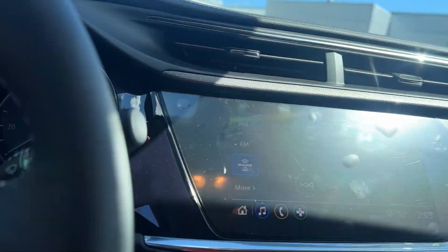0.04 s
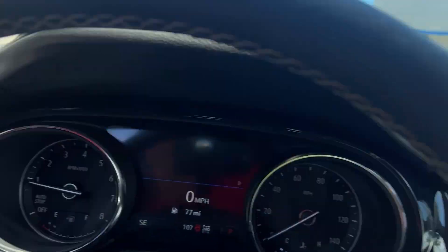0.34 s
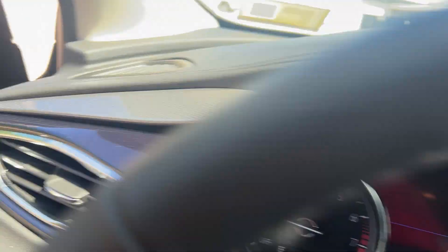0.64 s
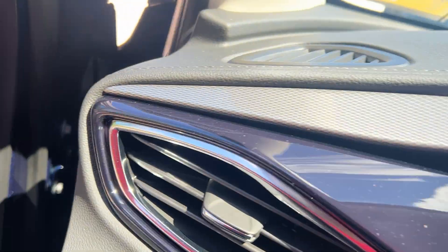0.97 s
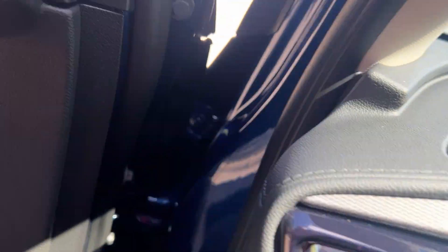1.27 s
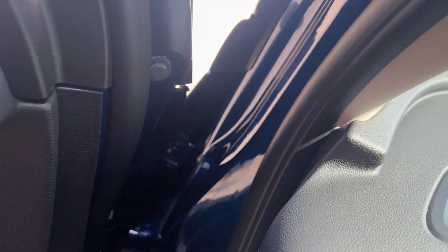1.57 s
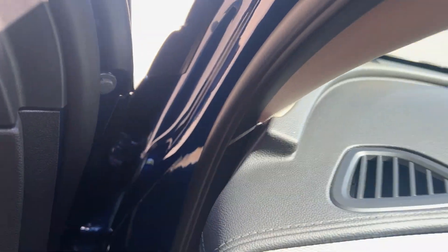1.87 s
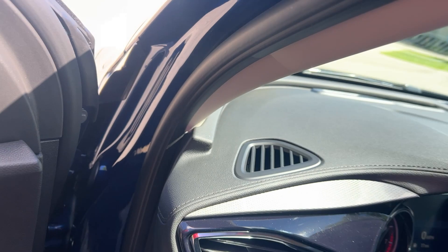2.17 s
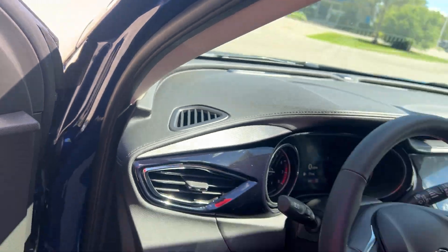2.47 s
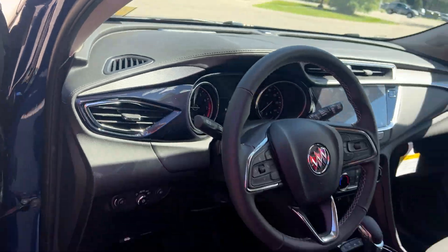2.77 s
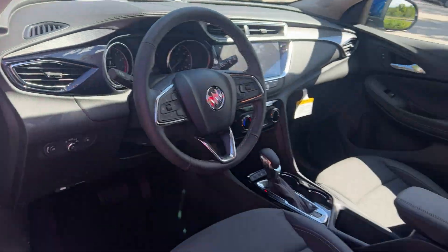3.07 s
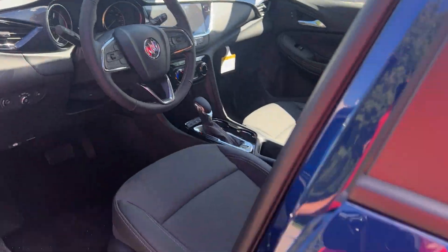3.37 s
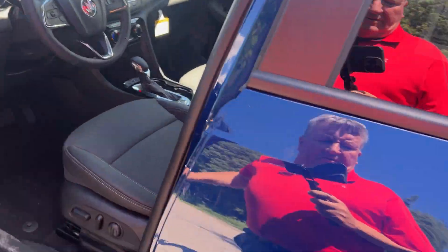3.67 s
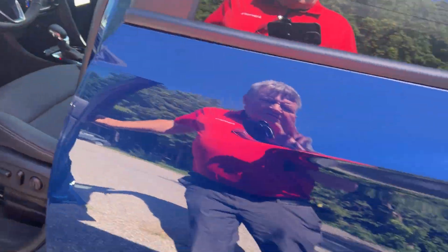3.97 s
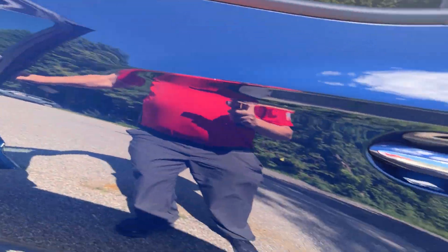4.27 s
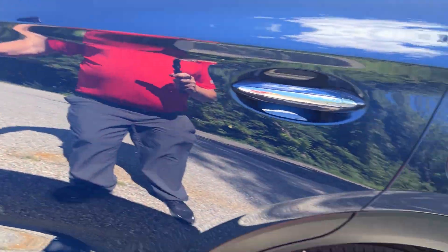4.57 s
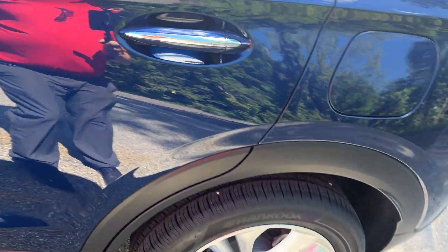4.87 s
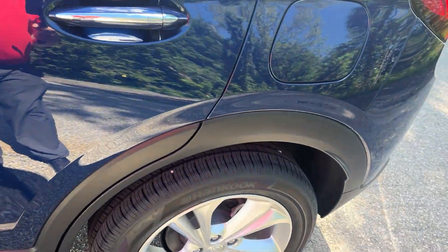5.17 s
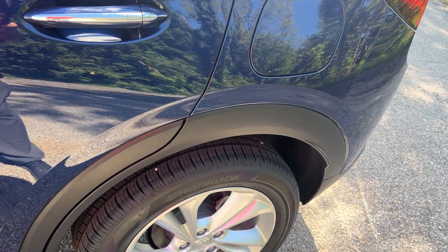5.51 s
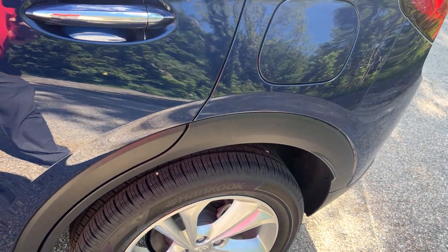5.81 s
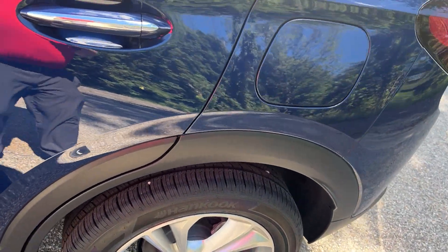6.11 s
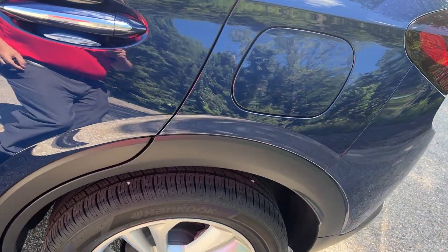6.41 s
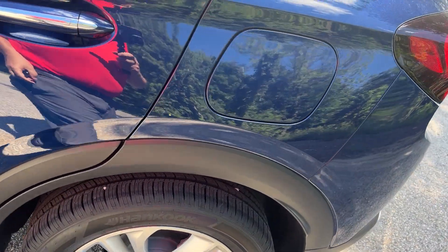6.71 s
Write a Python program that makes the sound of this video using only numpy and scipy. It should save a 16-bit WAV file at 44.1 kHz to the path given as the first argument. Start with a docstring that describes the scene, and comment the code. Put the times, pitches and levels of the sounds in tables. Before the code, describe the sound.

Close handling rumble, light ticks and shoe scuffs on grit as someone leaves a car, then the door shuts with a booming thump.

```python
"""A hand rumbles and bumps on a phone as someone steps out of a parked car onto gritty asphalt.
Clothes swish, plastic trim ticks, heels knock and soles scuff. Then the door swings shut: it meets
its seal, latches twice and its weight sets the car body booming.
Behind it all lie a low rumble, distant traffic, airy hiss and a faint, pulsing insect."""
import sys
import numpy as np
from scipy.fft import rfft, irfft, next_fast_len
from scipy.io import wavfile

SR = 44100
rng = np.random.default_rng(int(sys.argv[2]) if len(sys.argv) > 2 else 0)


def dump(signal):
    """Clip the signal to [-1, 1] and save it as 16-bit WAV at the path in sys.argv[1]."""
    limited = np.clip(np.atleast_2d(signal).T, -1, 1)
    pcm = np.round(limited * 32767).astype(np.int16)
    wavfile.write(sys.argv[1], SR, pcm)


N = 302085
TIME = np.arange(N) / SR  # scene clock [s]
AGE = np.arange(SR) / SR  # time since a contact [s]

# Levels are fader settings, ahead of each layer's own trim.
# open air, less shielded once the phone leaves the cabin: (time [s], traffic [dB], hiss [dB])
AIR_LEVELS = [(0, -52, -56.5), (.4, -56, -61.5), (.9, -50.5, -56.5), (1.6, -52, -60), (2.4, -52.5, -58.5),
              (3.0, -51, -56.5), (3.8, -50, -54.5), (4.9, -50.5, -53), (6.85, -49.5, -53.5)]
# fader rides of the low rumble and the insect: (time [s], level [dB])
RUMBLE_LEVELS = [(0, -57), (.35, -59), (.7, -40), (1.1, -41.5), (1.7, -35.5), (2.4, -35.5), (3.3, -42.5),
                 (4.2, -39), (5.1, -38.5), (5.45, -34), (6, -34), (6.3, -39), (6.85, -36)]
INSECT_LEVELS = [(0, -68), (.3, -65), (.53, -57.5), (.9, -68), (1.3, -62), (1.65, -62.5), (1.85, -67),
                 (2.1, -63), (2.5, -70), (3.5, -71), (6.85, -61.5)]
# tone of the bed's layers, from low rumble to top sheen: (frequency [Hz], level [dB])
RUMBLE_EQ = [(22, -40), (36, 6.5), (50, -3.5), (65, 3.5), (95, -7.5), (130, -6.5), (200, -8), (300, -15),
             (450, -19), (700, -55)]
TRAFFIC_EQ = [(150, -4), (300, -7.5), (500, 3), (800, 5.5), (1100, 3.5), (1500, -2.5), (2100, -6.5),
              (3000, -14.5), (5000, -36.5)]
HISS_EQ = [(1200, -18), (2500, -0.5), (4300, 2.5), (6500, -1.5), (8500, -0.5), (10500, -9), (15800, -21)]
SHEEN_EQ = [(6500, -35), (10000, 3.5), (13000, -6.5), (15800, -5.5)]
# stereo image of the open air: (frequency [Hz], left-right correlation [-1..1])
AIR_IMAGE = [(60, 0.085), (250, 0.061), (500, -0.12), (1000, -0.56), (2000, 0.078), (4000, 0.14),
             (8000, 0.18), (14000, -0.51)]

# the shirt rustles as the body turns: (peak time [s], half length [s], level [dB])
RUSTLES = [(0.116, 0.24, -56), (1.097, 0.2, -51), (1.773, .1, -52.5), (4.753, 0.3, -52.5)]
# clothes brush the seat and door frame: (peak time [s], half length [s], level [dB], centre [Hz])
SWISHES = [(1.15, 0.071, -49.5, 970), (1.416, 0.099, -56.5, 5560), (1.863, 0.15, -59, 3660),
           (2.302, 0.0043, -54.5, 5870), (3.41, 0.041, -49, 1820), (3.622, 0.23, -56, 1760),
           (3.841, 0.0033, -41.5, 5860)]
# small plastic ticks: (time [s], level [dB])
TICKS = [(0.041, -35), (0.0734, -35.5), (0.4884, -29), (0.7334, -30), (1.013, -28.5), (1.059, -31),
         (2.391, -39), (2.7348, -40), (3.358, -33), (3.6301, -36.5), (3.8375, -43), (5.5035, -33)]
# tone of shirt cloth and plastic trim: (frequency [Hz], level [dB])
SHIRT_EQ = [(400, -23), (1500, 6), (4000, -1.5), (8000, -2.5), (12000, -5), (16000, -9)]
TICK_EQ = [(710, -42), (1200, -4), (2210, 1), (4590, -7.5), (6480, -3), (8470, -9), (9430, 3), (10500, -12),
           (14300, -16), (15600, -19)]

# shifts of the grip, except at 5.348 s, where a low boom near 60 Hz lingers after the door shuts:
# (time [s], hold [s], low end [dB], rub [dB])
LOW_SWELLS = [(0.0, 0.054, -22.5, -36), (0.121, 0.096, -25.5, -38.5), (0.215, 0.016, -37, -36.5),
              (0.935, 0.23, -49.5, -43), (1.199, 0.059, -33.5, -41.5), (1.371, .19, -34.5, -41),
              (1.808, .13, -38, -42.5), (1.981, 0.039, -33, -29.5), (2.144, 0.032, -31.5, -43),
              (2.237, 0.033, -32, -32), (2.521, 0.12, -27.5, -27), (2.71, 0.01, -29, -24.5),
              (2.788, 0.17, -27.5, -32), (2.827, 0.02, -22.5, -18), (3.097, 0.16, -35, -46.5),
              (3.369, 0.058, -33.5, -36.5), (3.576, 0.0071, -28.5, -29.5), (3.673, 0.083, -37, -36),
              (3.82, 0.11, -27.5, -30), (4.006, .16, -29, -28.5), (4.246, 0.29, -29.5, -34.5),
              (4.682, 0.19, -33.5, -35), (5.348, 0.514, -31.5, -50.5), (6.008, 0.11, -31, -33),
              (6.464, 0.14, -36.5, -38.5)]
# the hand bumps the case: (time [s], level [dB], pitch [Hz], snap over the knock [dB])
CASE_BUMPS = [(0.039, -7, 300, -28), (0.067, -7.5, 197, -33), (0.125, -11, 174, -28),
              (1.203, -18.5, 174, -16), (1.979, -15, 250, -30), (2.017, -11.5, 214, -11),
              (2.11, -14.5, 183, -27), (2.244, -12.5, 237, -20), (2.557, -3, 288, -38),
              (2.564, -14, 220, -1), (2.612, -12.5, 322, -20), (2.711, -10.5, 257, -5.5),
              (2.847, -7.5, 412, -11), (2.896, -9, 165, -10.5), (3.41, -13.5, 235, -22),
              (3.584, -24.5, 198, 1), (3.798, -12, 172, -31), (3.858, -11, 217, -28),
              (3.907, -9.5, 170, -9.5), (3.997, -18, 169, -10), (4.121, -18, 204, -7),
              (4.16, -14.5, 343, -10), (4.33, -15, 298, -9), (4.364, -14, 252, -34), (4.469, -15, 238, -3),
              (4.745, -14.5, 170, -6.5), (5.845, -6, 198, -34), (6.042, -9.5, 180, -26),
              (6.076, -10.5, 340, -16)]
# tone of the swells' low end and rub: (frequency [Hz], level [dB])
LOW_END_EQ = [(22, -36), (40, -10), (62, -3), (85, -4.5), (120, -7.5), (170, -17), (300, -39.5), (600, -75)]
RUB_EQ = [(70, -12), (150, 2), (270, -8.5), (400, -8.5), (500, -9.5), (700, -39), (1200, -68)]

# knocks of trim, heels and stones, except at 2.149 and 3.156 s, the brief pitched ring of a sole
# scuffing on grit: (time [s], crunch [dB], ring [dB], ring pitch [Hz])
SHORT_RINGS = [(0.6356, -33.5, -21.5, 646), (0.884, -40, -30.5, 900), (2.016, -44, -34.5, 2830),
               (2.149, -40, -26, 1110), (2.852, -36, -44, 1330), (3.156, -42, -24, 1850),
               (4.606, -33.5, -31, 945), (4.66, -27, -17, 1415), (4.769, -36, -21, 1650),
               (4.839, -29, -13, 737), (5.467, -35, -27, 1360), (5.5182, -21.5, -19.5, 1260),
               (5.532, -32, -23, 1300), (5.578, -29, -40, 1190), (5.592, -26, -42, 1680)]
# soles slide on grit:
# (peak time [s], 20 dB rise [s], 20 dB fall [s], level [dB], ring pitch [Hz], ring over grit [dB])
SCUFFS = [(.82, 0.1, 0.063, -50, 850, 12), (0.948, 0.027, 0.023, -45, 880, 5),
          (2.164, 0.038, 0.043, -35, 1100, 21), (2.182, 0.038, 0.026, -35, 1710, 7),
          (2.527, 0.034, 0.047, -33, 960, 9), (2.572, 0.065, 0.033, -30, 2930, 5),
          (2.856, 0.047, 0.069, -39, 1310, 1), (2.909, 0.019, 0.032, -40.5, 1160, 9),
          (3.158, 0.059, 0.049, -29.5, 1810, 7), (3.18, 0.026, 0.03, -32, 1760, 9),
          (3.431, 0.069, 0.061, -44, 1390, 12), (4.651, 0.056, 0.029, -37.5, 1600, 10),
          (4.765, 0.14, 0.046, -36.5, 1260, 3), (4.846, 0.049, 0.014, -36, 1610, -3),
          (5.552, 0.046, 0.044, -37, 1490, 2)]
# tone of grit underfoot: (frequency [Hz], level [dB])
GRIT_EQ = [(200, -10), (500, 2), (1000, 2), (2200, 0.5), (3500, -5.5), (5500, -13), (8000, -12.5),
           (12000, -17.5), (16000, -23)]

# door contacts, seal to second catch: (time [s], shell ring [dB], skin rattle [dB], latch [dB])
DOOR_CONTACTS = [(5.203, -17.5, -28.5, -40), (5.211, -13, -19.5, -35), (5.2207, -10, -19.5, -24),
                 (5.229, -21, -18.5, -24.5), (5.2589, -17, -24.5, -26.5), (5.263, -28, -17.5, -46),
                 (5.276, -30, -43, -46)]
# resonances of the door's skin: (frequency [Hz], width [Hz], level [dB])
SKIN_BANDS = [(348, 130, 11.5), (510, 140, -7.5), (670, 110, -4), (784, 110, 2), (1020, 94, -11),
              (1290, 75, -7), (1620, 80, -24), (2130, 330, -19)]
# tone of the steel latch: (frequency [Hz], level [dB])
LATCH_EQ = [(700, -15), (1400, 1.5), (2300, -2), (3100, 2.5), (4200, -6.5), (5500, -17), (8000, -13),
            (12000, -22), (16000, -32)]
# the door's weight lands and settles: (time [s], level [dB], centre of the push [Hz])
DOOR_PUSHES = [(5.2103, -12, 303), (5.2283, 0, 250), (5.232, -6, 60), (5.243, -8.5, 153), (5.2637, -5, 370),
               (5.2687, -3, 119), (5.278, -2, 58)]
# modes of the hollow door shell and of the car body and cabin: (frequency [Hz], level [dB], t60 [s])
SHELL_MODES = [(763, -6, 0.069), (853, -0.5, 0.064), (1100, -11, 0.091), (1364, -13, 0.095),
               (1700, -16.5, 0.06), (3170, -27, 0.075)]
BODY_MODES = [(50, -6, 0.22), (61.2, -10, 0.37), (74.4, -14, 0.5), (120, -2, 0.089), (139.2, -11, 0.41),
              (170.6, -1, 0.16), (241, -21, 0.084), (267, 0, 0.048), (321, -11, 0.078), (419, -17, 0.13)]
# treble dips of the microphone pair: (frequency [Hz], width [Hz])
MID_DIPS, SIDE_DIPS = [(9400, 482), (14300, 670)], [(12000, 720)]


def amp(db):
    """Decibels to gain."""
    return 10 ** (np.asarray(db) / 20)


def unit(x):
    """Scale to rms 1."""
    return x / np.sqrt(np.mean(x ** 2) + 1e-20)


def along(points, hz):
    """Read (frequency [Hz], value) points on a log frequency axis."""
    f, values = np.transpose(points)
    return np.interp(np.log(hz + 1), np.log(f + 1), values)


def curves(rows):
    """One fader curve over the scene for each column after the time."""
    times, *columns = np.transpose(rows)
    return [np.interp(TIME, times, column) for column in columns]


def filtered(x, response):
    """Shape x with a complex frequency response."""
    n = x.shape[-1]
    padded = next_fast_len(n + 4096)
    return irfft(rfft(x, padded) * response(np.fft.rfftfreq(padded, 1 / SR)), padded)[..., :n]


def resonance(f, hz, width):
    """One damped resonance, gain 1 at its centre."""
    return 1j * f * width / (hz * hz - f * f + 1j * f * width)


def noise(colour, image, size=N):
    """Coloured stereo noise of rms 1; image lists (frequency [Hz], left-right correlation [-1..1])."""
    def mid_side(f):
        angle = np.arccos(np.clip(along(image, f), -1, 1)) / 2
        return colour(f) * np.array([np.cos(angle), np.sin(angle)])
    mid, side = filtered(rng.standard_normal((2, size)), mid_side)
    return unit(np.array([mid + side, mid - side]))


def eq_noise(eq, image, size=N):
    """Stereo noise through an EQ curve of (frequency [Hz], level [dB]) points."""
    return noise(lambda f: amp(along(eq, f)), image, size)


def grainy(rate, depth_db, size=N):
    """A spiky random gain of rms 1 that glides to a new level rate times a second."""
    knots = np.clip(rng.standard_normal(size), -2, 2)
    samples = np.arange(size)
    return unit(amp(depth_db * np.interp(samples * rate / SR, samples, knots)))


def decay(t, t60, attack):
    """Envelope of a hit: a quick rise, then 60 dB down in t60 seconds."""
    return amp(-60 * t / t60) * (1 - np.exp(-t / attack))


def add(track, start, sound):
    """Mix a sound into a track from start [s]."""
    part = track[..., max(round(start * SR), 0):][..., :sound.shape[-1]]
    part += sound[..., :part.shape[-1]]


def pan(x, left_db, lead_ms=0):
    """Place a sound: positive values make the left channel louder and earlier."""
    ear = np.array([[.5], [-.5]])
    return filtered(x, lambda f: amp(ear * left_db) * np.exp(2j * np.pi * f * ear * lead_ms / 1000))


def open_air():
    """A bed of low rumble, far traffic and hiss; the hiss brightens as it swells outside the cabin."""
    traffic_db, hiss_db = curves(AIR_LEVELS)
    sheen_db = -59.5 + 1.6 * (hiss_db - hiss_db.max())
    rumble = amp(curves(RUMBLE_LEVELS)[0]) * eq_noise(RUMBLE_EQ, AIR_IMAGE) * grainy(rate=20, depth_db=6)
    traffic = amp(traffic_db + 4.5) * eq_noise(TRAFFIC_EQ, AIR_IMAGE) * grainy(rate=19, depth_db=0.3)
    hiss = amp(hiss_db + 2) * eq_noise(HISS_EQ, AIR_IMAGE)
    sheen = amp(sheen_db) * eq_noise(SHEEN_EQ, AIR_IMAGE)
    return rumble + pan(traffic, left_db=0.5) + pan(hiss + sheen, left_db=-4)


def insect(song_hz=4150, width_hz=260, pulse_hz=55):
    """A distant insect buzzes in quick narrow-band pulses."""
    pulses = 1 + .6 * np.cos(2 * np.pi * pulse_hz * TIME)
    song = noise(lambda f: resonance(f, song_hz, width_hz) ** 2, image=[(4000, 0.21)])
    return amp(curves(INSECT_LEVELS)[0] - 0.5) * unit(song * pulses)


def shirt():
    """Light cloth rustles in broad, airy swells."""
    swells = sum(amp(db) * np.exp(-((TIME - peak) / half) ** 2) for peak, half, db in RUSTLES)
    return swells * eq_noise(SHIRT_EQ, AIR_IMAGE) * grainy(rate=120, depth_db=1.5)


def clothes():
    """Fabric slides over the seat and door frame in soft swishes and brief zips."""
    out, t = np.zeros((2, N)), AGE[:SR // 2]
    crest = t.mean()
    for peak, half, db, hz in SWISHES:
        swell = np.exp(-((t - crest) / half) ** 2)
        weave = grainy(rate=400, depth_db=2.5, size=len(t))
        fibres = noise(lambda f: resonance(f, hz, .35 * hz) ** 2, image=[(3000, 0.55)], size=len(t))
        add(out, peak - crest, amp(db) * swell * weave * fibres)
    return out


def trim_ticks():
    """Plastic trim ticks lightly, with a brief cabin tail."""
    out, t = np.zeros((2, N)), AGE[:SR // 12]
    envelope = decay(t, t60=0.023, attack=0.00033) + amp(-12) * decay(t, t60=0.083, attack=0.0011)
    for start, db in TICKS:
        add(out, start, amp(db - 3.5) * envelope * eq_noise(TICK_EQ, image=[(3000, 0.4)], size=len(t)))
    return pan(out, left_db=-3)


def swell_gains(attack_s=0.055, release_s=0.11):
    """Gains of low end and rub: each swell rises, holds and falls, 20 dB per attack or release."""
    low, rub = amp(-54.5), amp(-49.5)  # the hand at rest
    for start, hold, low_db, rub_db in LOW_SWELLS:
        before, after = (start - TIME) / attack_s, (TIME - start - hold) / release_s
        envelope = amp(np.clip(-20 * np.maximum(before, after), -100, 0))
        low = np.maximum(low, amp(low_db) * envelope)
        rub = np.maximum(rub, amp(rub_db) * envelope)
    return low, rub


def skin_slips(median_rate=100, slip_hz=240.8, pitch_scatter=0.33, scatter_db=4.5):
    """Skin sticks and slips: a train of one-cycle thuds of uneven spacing, size, pitch and pan."""
    count, t = 1200, AGE[:SR // 40]
    gap, pitch, size, side = rng.standard_normal((count, 4)).T[:, :, None]
    onsets = np.cumsum(np.exp(.5 * gap), axis=0) * SR / median_rate
    cycles = slip_hz * np.exp(pitch_scatter * np.clip(pitch, -2, 2)) * t
    strength = amp(scatter_db * np.clip(size, -2, 1))
    thuds = strength * np.sin(2 * np.pi * cycles) * cycles * np.exp(-2.6 * cycles)
    samples = (onsets.astype(int) + np.arange(len(t))).ravel()
    channels = [np.bincount(samples, (thuds * amp(ear * side)).ravel(), N)[:N] for ear in (1, -1)]
    return unit(np.array(channels))


def case_bumps(push_hz=90, snap_hz=520):
    """The hand bumps the case, dead centre: a dull knock with a low push and a higher snap."""
    out, t = np.zeros(N), AGE[:SR // 8]
    for start, db, hz, snap_db in CASE_BUMPS:
        detune = rng.uniform(0.99, 1.01)
        knock = np.sin(2 * np.pi * hz * t) * decay(t, t60=0.022, attack=0.0028)
        push = np.sin(2 * np.pi * push_hz * t) * decay(t, t60=0.024, attack=0.012)
        snap = np.sin(2 * np.pi * snap_hz * detune * t) * decay(t, t60=0.016, attack=0.0019)
        add(out, start, amp(db + 4.5) * (knock + amp(-19) * push + amp(snap_db) * snap))
    return out


def handling_and_boom_tail():
    """The grip sways, rubs and bumps, cushioned by flesh; the low end also holds the door's boom tail."""
    low_gain, rub_gain = swell_gains()
    low_end = low_gain * amp(0.5) * eq_noise(LOW_END_EQ, image=[(60, 0.98)])
    friction = eq_noise(RUB_EQ, image=[(200, 0.68), (700, 0.31)])
    rub = rub_gain * (amp(-8) * friction + amp(-2.5) * skin_slips())
    cushion = lambda f: amp(along([(20, -27), (55, 0.5), (620, 0), (1100, -3.5), (3000, -32)], f))
    return low_end + filtered(rub + case_bumps(), cushion)


def short_rings():
    """A short crunch around one pitch: a knock of trim, heel or stone, or a scuffing sole's ring."""
    out, t = np.zeros((2, N)), AGE[:SR // 6]
    envelope = decay(t, t60=0.015, attack=0.00071) + amp(-7.5) * decay(t, t60=0.05, attack=0.00087)
    for start, crunch_db, ring_db, hz in SHORT_RINGS:
        crunch = eq_noise(GRIT_EQ, image=[(800, 1), (2000, 0.5), (6000, 0.18)], size=len(t))
        ring = pan(np.sin(2 * np.pi * hz * t), left_db=3.5, lead_ms=0.098)
        add(out, start, envelope * (amp(crunch_db) * crunch + amp(ring_db) * ring))
    return out


def close_echoes(x, count=4, echo_db=-8, latest_s=0.009):
    """Early reflections off the car's side and the ground colour a sound."""
    out = x.copy()
    for delay, sign in zip(rng.uniform(.002, latest_s, count), rng.choice([-1, 1], count)):
        add(out, delay, sign * amp(echo_db) * x)
    return out


def scuffs(ring_width_hz=190):
    """Soles slide on grit in swelling bursts of tiny fractures, each with one ringing band."""
    out, t = np.zeros((2, N)), AGE[:SR // 3]
    crest = t.mean()
    for peak, rise, fall, db, hz, ring_db in SCUFFS:
        swell = amp(-20 * np.maximum((crest - t) / rise, (t - crest) / fall))
        cracks = grainy(rate=290, depth_db=6, size=len(t))
        ring = lambda f: 1 + amp(ring_db) * abs(resonance(f, hz, ring_width_hz)) ** 2
        colour = lambda f: amp(along(GRIT_EQ, f)) * ring(f)
        grit = noise(colour, image=[(800, 0.53), (2000, 0.067), (6000, 0.069)], size=len(t))
        add(out, peak - crest, close_echoes(amp(db + 0.5) * swell * cracks * grit))
    return out


def door_clack():
    """Each contact rings the door's hollow shell, rattles its skin and snaps the steel latch."""
    out, t = np.zeros((2, N)), AGE[:SR // 3]
    skin_colour = lambda f: sum(amp(db) * abs(resonance(f, hz, width)) ** 2
                                for hz, width, db in SKIN_BANDS)
    shell = sum(amp(db) * np.sin(2 * np.pi * hz * t) * decay(t, t60, attack=0.00096)
                for hz, db, t60 in SHELL_MODES)
    rattle = decay(t, t60=0.12, attack=0.00088) + amp(-19.5) * decay(t, t60=0.37, attack=0.01)
    snap = decay(t, t60=0.064, attack=0.00026)
    for start, shell_db, skin_db, latch_db in DOOR_CONTACTS:
        skin = rattle * noise(skin_colour, image=[(400, 0.65), (1500, 0.14)], size=len(t))
        latch = snap * eq_noise(LATCH_EQ, image=[(2500, 0.18), (7000, 0.075)], size=len(t))
        add(out, start, amp(shell_db) * shell + amp(skin_db) * skin + amp(latch_db) * latch)
    return pan(out, left_db=4, lead_ms=0.45)


def door_boom(selectivity=3):
    """The door's weight rings the body: a hard push wakes high modes, a cushioned one low modes."""
    out = np.zeros(N)
    for start, db, push_hz in DOOR_PUSHES:
        for hz, mode_db, t60 in BODY_MODES:
            share = 1 / (1 + (selectivity * np.log(hz / push_hz)) ** 2)
            ring = np.sin(2 * np.pi * hz * AGE) * decay(AGE, t60, attack=0.0035)
            add(out, start, amp(db + mode_db) * share * ring)
    return pan(out, left_db=1.5, lead_ms=0.82)


def scene():
    """The mix: outdoor bed, close sounds, footwork and the door."""
    bed = open_air() + insect()
    close = handling_and_boom_tail() + clothes() + shirt() + trim_ticks()
    footwork = pan(short_rings() + scuffs(), left_db=-1, lead_ms=0.13)
    return bed + close + footwork + door_clack() + door_boom()


def record(dry):
    """The phone's stereo microphone notches the treble, rounds tall peaks and cuts both band ends."""
    ceiling, low_cut_hz, high_cut_hz = 0.75, 26.8, 15850
    dips = lambda rows, f: amp(-24 * sum(np.exp(-((f - hz) / width) ** 2) for hz, width in rows))
    mid = filtered((dry[0] + dry[1]) / 2, lambda f: dips(MID_DIPS, f))
    side = filtered((dry[0] - dry[1]) / 2, lambda f: dips(SIDE_DIPS, f))
    pair = np.array([mid + side, mid - side])
    rounded = pair / (1 + (pair / ceiling) ** 6) ** (1 / 6)
    return filtered(rounded, lambda f: (f < high_cut_hz) * f ** 4 / (f ** 4 + low_cut_hz ** 4))


dry = scene()
out = record(dry)
dump(out)
```